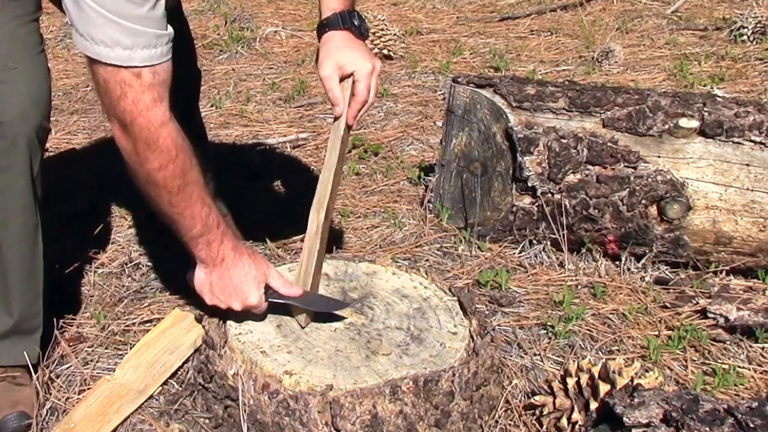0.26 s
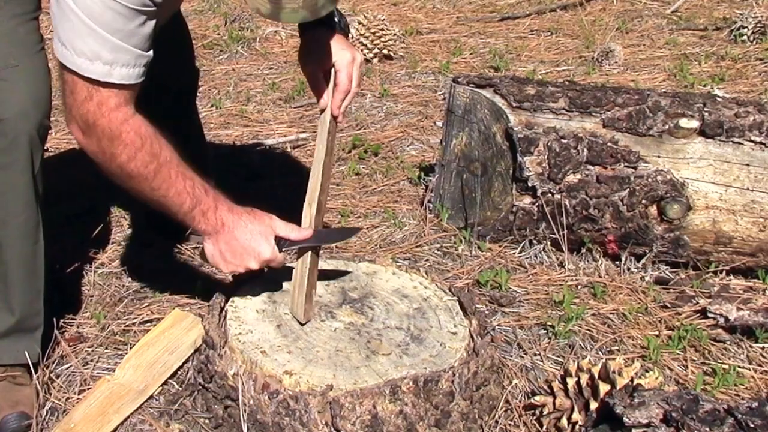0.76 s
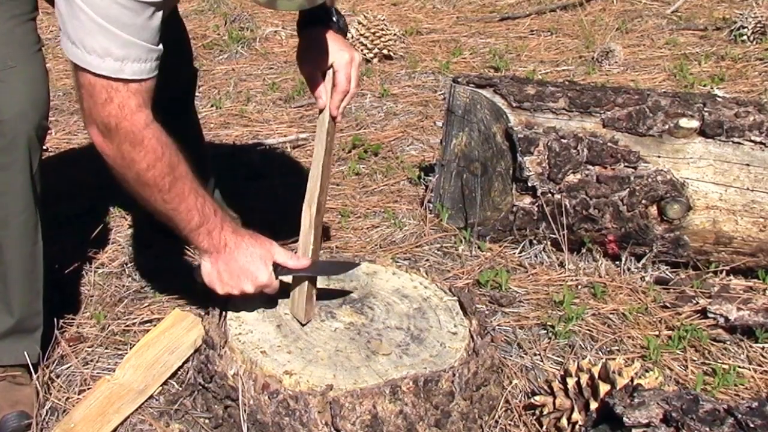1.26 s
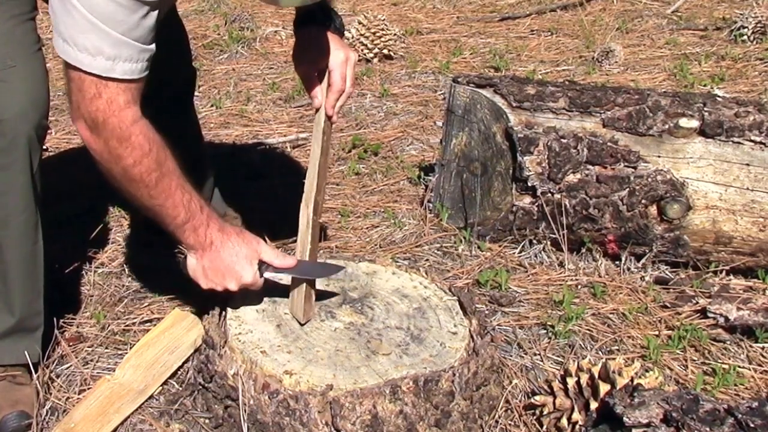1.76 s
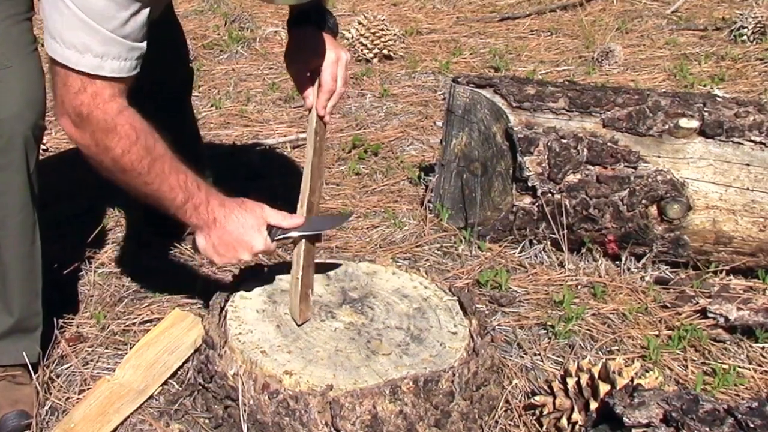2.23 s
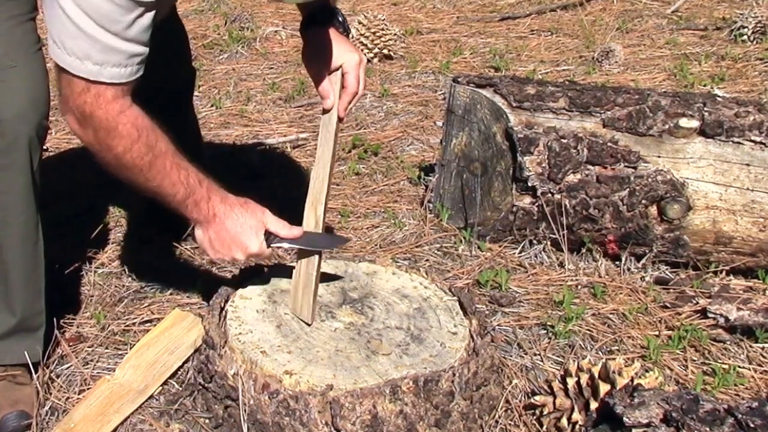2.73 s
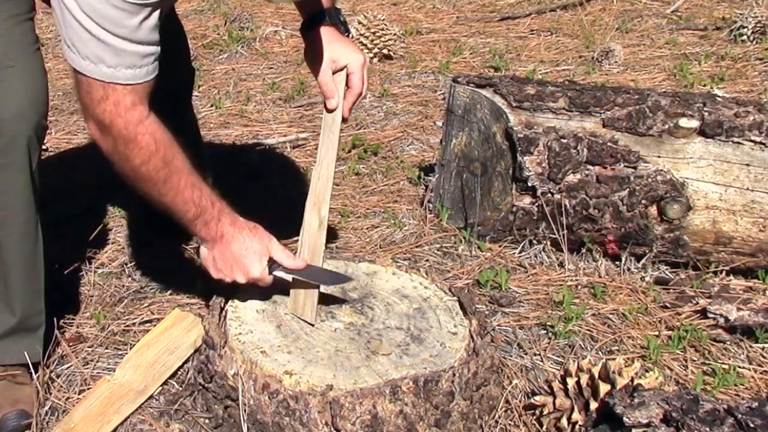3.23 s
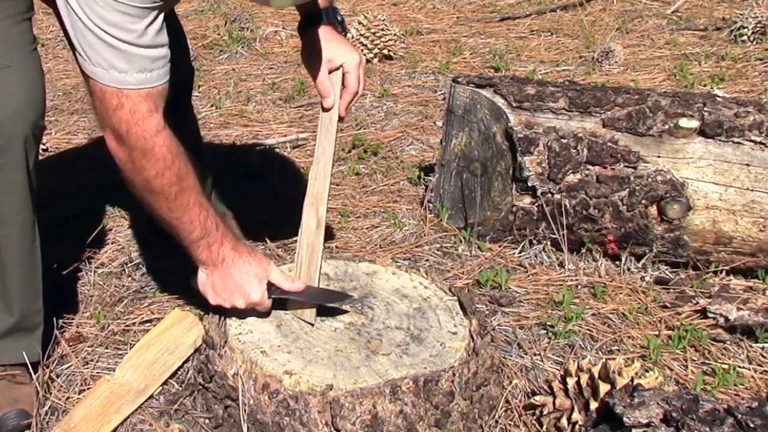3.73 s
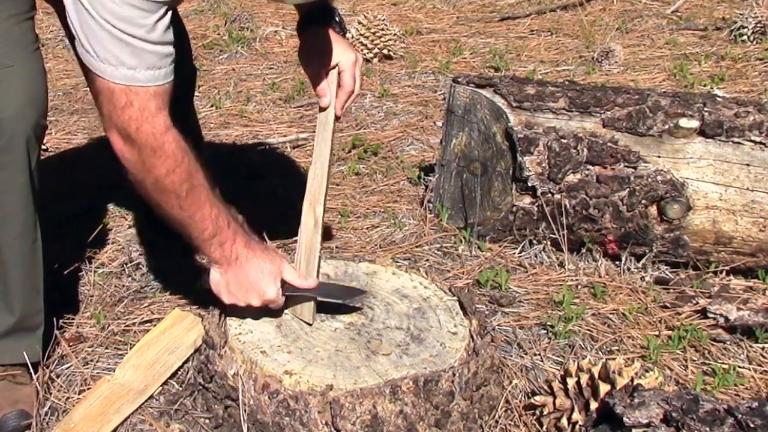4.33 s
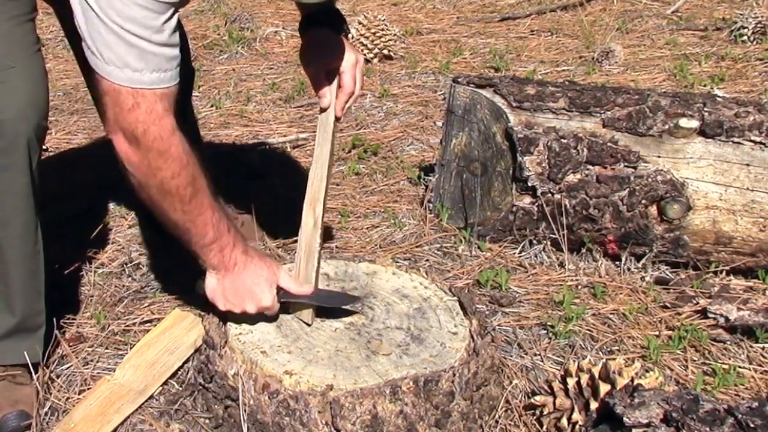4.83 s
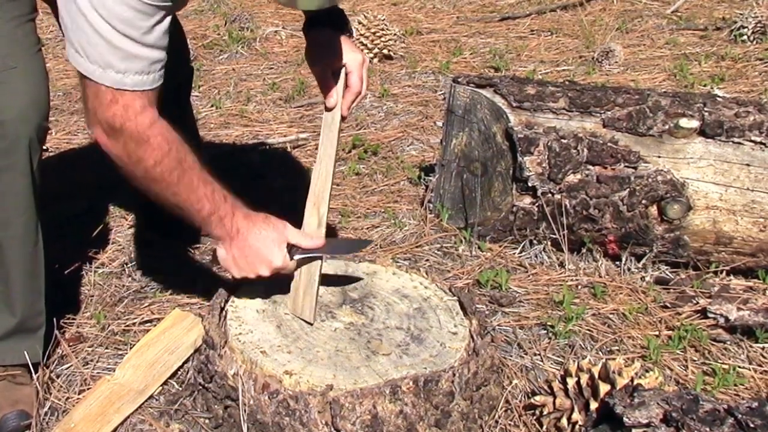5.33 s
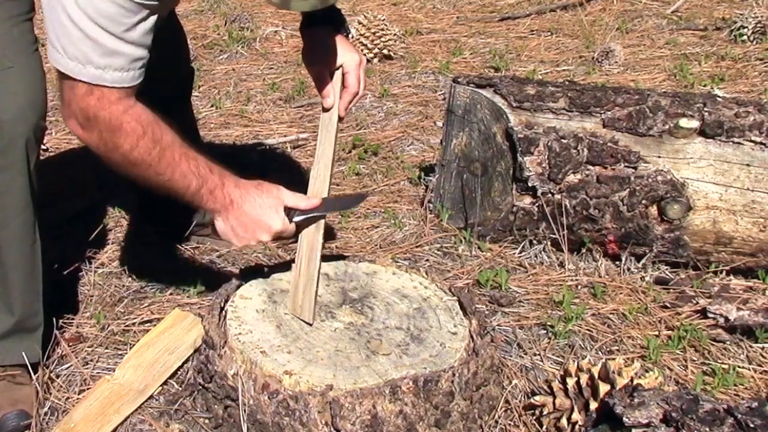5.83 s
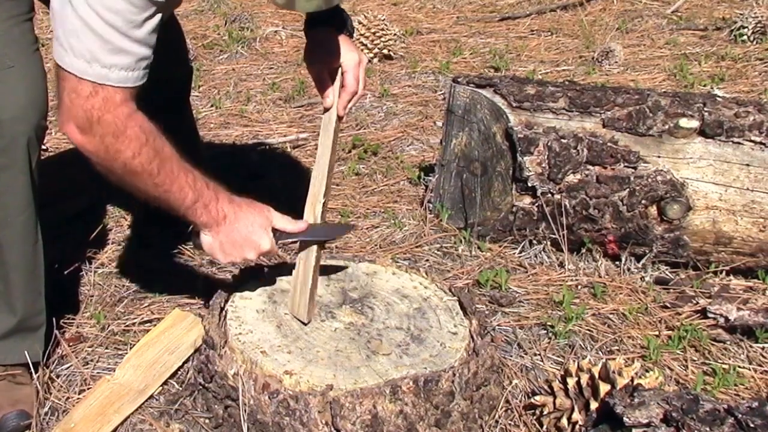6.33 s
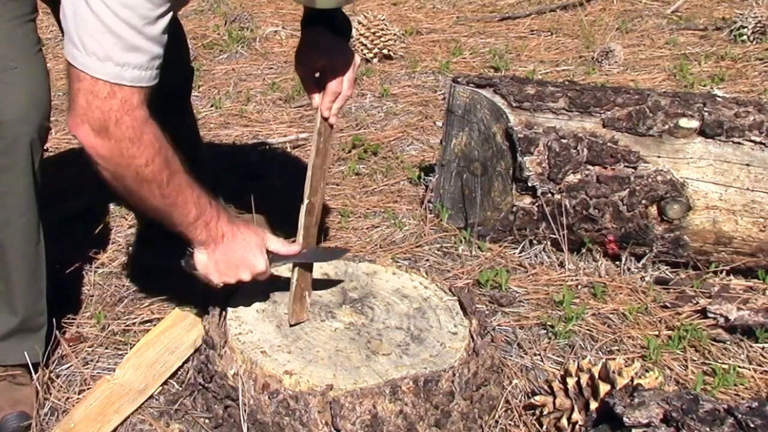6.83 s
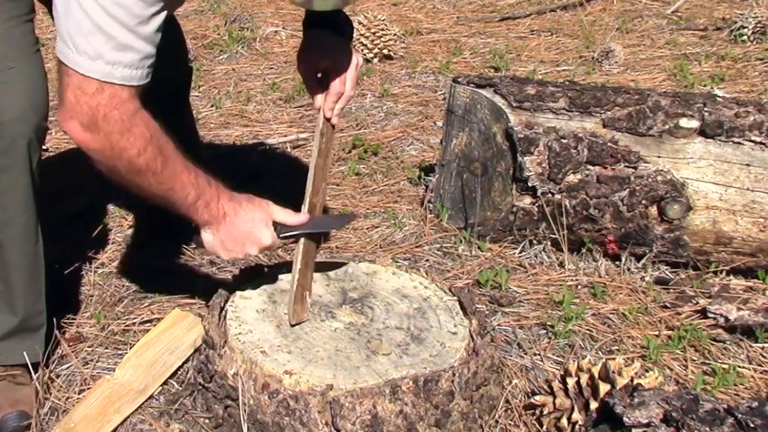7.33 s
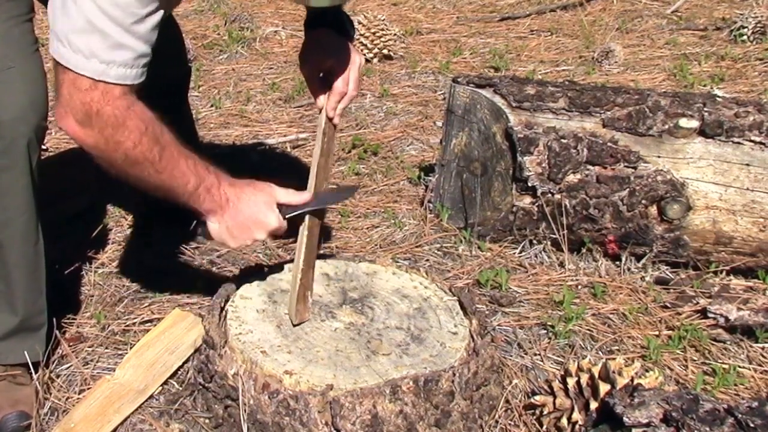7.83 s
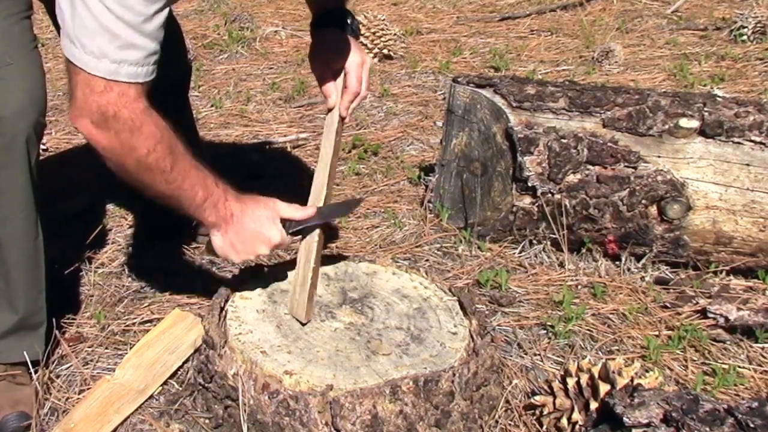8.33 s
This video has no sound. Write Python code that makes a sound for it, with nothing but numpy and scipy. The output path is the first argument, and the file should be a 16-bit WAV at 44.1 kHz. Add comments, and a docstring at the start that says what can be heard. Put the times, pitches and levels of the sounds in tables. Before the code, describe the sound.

Outdoors, close to the microphone, a steel knife spine scrapes quickly along a split stick standing on a stump. After a light first touch at about 0.1 s, short harsh down strokes alternate with softer, lower-pitched return strokes, a pair roughly every 0.27 s, until the sound ends mid-action at 8.6 s. Each stroke is a brief stick-slip burst: hollow woody judder, coarse midrange rasp, fine fibre fizz and a very faint high steel ring. From 2.7 s the tone becomes fuller and woodier, with louder returns, strongest around 3.5 to 6.2 s. After 6.4 s it turns thinner and drier, the returns losing body, while catches and splinter snaps become more frequent and sharp near 7.6 to 8.5 s. Faint distant wind and slight hiss continue beneath, with a short dull ground reflection.

```python
"""Knife scraping a split stick

A steel knife spine scrapes down and up a split stick that stands on a stump, outdoors.
The edge sticks and slips on the grain: coarse slips bend the stick, fine ones rasp in its upper modes,
torn fibres fizz and set the blade ringing. Snags knock the stick and splinters crack off.
Stump and forest floor return a dull tail; wind rushes faintly in far trees under slight microphone hiss."""
import sys
import numpy as np
from scipy import signal
from scipy.io import wavfile
from scipy.ndimage import uniform_filter1d

SR = 44100
rng = np.random.default_rng(int(sys.argv[2]) if len(sys.argv) > 2 else 0)


def wrap_up_sound(samples):
    """Save the sound to the file named by the first command line argument, as 16-bit audio."""
    columns = np.atleast_2d(samples).T
    # keep every value between -1 and 1, then stretch to whole-number steps
    tamed = np.clip(columns, -1, 1)
    steps = np.round(tamed * 32767).astype(np.int16)
    wavfile.write(sys.argv[1], SR, steps)


N = 377937


def amp(db):
    """Amplitude factor of a level in dB."""
    return 10 ** (np.asarray(db) / 20)


def evened(x):
    """Scales to unit RMS."""
    return x / np.sqrt(np.mean(x ** 2) + 1e-20)


def read(points, hz):
    """Reads a spectrum given as (Hz, dB) points, straight over log frequency."""
    f, value = np.transpose(points)
    return np.interp(np.log(hz + 1), np.log(f + 1), value)


def colour(x, points):
    """Minimum-phase filter with the given relative dB spectrum; white input keeps its power."""
    bins_hz = abs(np.fft.fftfreq(4096, 1 / SR))
    log_gain = np.log(amp(read(points, bins_hz)))
    taps = np.fft.ifft(np.exp(np.conj(signal.hilbert(log_gain)))).real[:2048]
    return signal.oaconvolve(x, taps / np.linalg.norm(taps))[:N]


def resonate(x, hz, width_hz):
    """Shifts hz down to zero, smooths, shifts back; white input keeps its power."""
    turn = np.exp(2j * np.pi * np.cumsum(hz * np.ones(N)) / SR)
    r = np.exp(-np.pi * width_hz / SR)
    smoothed = signal.lfilter([1], [1, -r], x / turn)
    return np.sqrt(2 * (1 - r * r)) * (turn * smoothed).real


def modes(x, table, slide=1):
    """Sum of resonances with alternating sign, their pitches multiplied by slide."""
    total = np.zeros(N)
    for k, (hz, width_hz, db) in enumerate(table):
        total += (-1) ** k * amp(db) * resonate(x, hz * slide, width_hz)
    return total


def slips(per_s, spread_db):
    """Random clicks of either sign, a few of them large, at unit RMS."""
    struck = rng.random(N) < per_s / SR
    size = np.minimum(rng.exponential(1, N), 3)
    sign = rng.choice([-1., 1.], N)
    return evened(struck * sign * amp(spread_db * size))


def chatter(ms, depth_db):
    """Gain that wavers at random over a few milliseconds, as edge pressure does; depth is RMS."""
    size = max(round(ms * SR / 1000), 1)
    smooth = uniform_filter1d(uniform_filter1d(rng.standard_normal(N), size), size)
    return amp(depth_db * evened(smooth))


def swelled(t, s, db, roundness=0.15):
    """Joins level points as rounded swells rather than straight ramps in dB."""
    return np.interp(t, s, amp(db) ** roundness) ** (1 / roundness)


# Microphone hiss spectrum. Each row: frequency in Hz, relative density in dB per Hz.
HISS_SPECTRUM = [(30, -2), (300, 1.5), (800, -9), (1500, -12), (3000, 0), (5000, 4), (12000, -8),
                 (15500, -12)]
HISS_DB = -75


def microphone_hiss():
    """Steady coloured noise."""
    return amp(HISS_DB) * evened(colour(rng.standard_normal(N), HISS_SPECTRUM))


# Wind spectrum. Each row: frequency in Hz, relative density in dB per Hz.
WIND_SPECTRUM = [(18, -19), (30, -10.5), (141, 1.5), (311, -7.5), (721, 0), (844, 1.5), (1540, -6.5),
                 (1910, -8.5), (4190, -32), (13000, -41.5), (16000, -38)]
# Slow rise of the wind. Each row: time in seconds, level in dB re WIND_DB.
WIND_RISE = [(0, -5.5), (.6, 0), (8.57, 1)]
WIND_DB = -52.5


def wind():
    """Coloured noise as a far rush that rises a little and swells slowly."""
    swell = evened(uniform_filter1d(uniform_filter1d(rng.standard_normal(N), size=9000), size=9000))
    rise_db = np.interp(np.arange(N) / SR, *np.transpose(WIND_RISE))
    rush = evened(colour(rng.standard_normal(N), WIND_SPECTRUM))
    return amp(WIND_DB + rise_db + 0.3 * swell) * rush


def ground(x):
    """Stump, log and forest floor scatter a short dull tail back: decaying noise as impulse response."""
    t = np.arange(round(.3 * SR)) / SR
    tail = rng.standard_normal(len(t)) * amp(-60 * t / 0.19) * (t > .003)
    scattered = signal.oaconvolve(x, tail / np.linalg.norm(tail))
    return colour(scattered, [(100, 9.5), (1000, -6), (4000, -1.5), (12000, -3)])


# Splinters snapping off. Each row: time in seconds, relative level in dB.
SPLINTERS = [(0.0985, -47), (0.238, -28.5), (0.6086, -39), (1.4553, -37), (1.5293, -33), (1.6941, -36),
             (2.877, -34), (2.918, -37.5), (3.167, -32), (3.19, -35), (3.4434, -32), (4.8185, -46),
             (5.135, -25), (5.397, -30), (5.518, -46), (5.961, -33), (6.265, -47), (6.2777, -48),
             (6.3573, -33), (6.375, -26), (6.773, -44), (6.8024, -40), (7.142, -29.5), (7.62, -34),
             (7.6289, -25), (8.048, -37), (8.0963, -25.5), (8.2662, -32), (8.513, -29.5), (8.559, -29)]


def splinters():
    """Each snap is a wide noise crack that decays 60 dB in 12 ms."""
    t, out = np.arange(500) / SR, np.zeros(N + 500)
    for s, db in SPLINTERS:
        crack = amp(db + 3.0 - 60 * t / 0.012) * rng.standard_normal(len(t))
        out[round(s * SR):][:len(t)] += crack
    return colour(out[:N], [(1200, -4), (3000, 2.5), (6000, 4.5), (9500, -2.5), (12500, -11.5), (15200, -32)])


# Slow drift of the treble. Each row: time in seconds, relative level of the highest fizz in dB,
# relative level of the blade ring in dB.
TREBLE_DRIFT = [(0, -17.5, -40), (.8, 4, -25), (1.5, 0.5, -30), (2.2, 0, -25), (3.4, -20, -34),
                (4.4, -1.5, -42), (6, 3.5, -34), (6.6, -1, -21), (7.8, 6, -27), (8.57, 7, -31)]


def treble(t, bite):
    """Gains of the highest fizz and the blade ring: slow drift, duller at low bending pitch."""
    drift_s, top_db, ring_db = np.transpose(TREBLE_DRIFT)
    top = amp(np.interp(t, drift_s, top_db) + 5.7 * bite)
    ring = amp(np.interp(t, drift_s, ring_db) + 4.0 * bite)
    return top, ring


BLADE_HZ, BLADE_WIDTH_HZ = 14530, 80


def blade(tear, ring):
    """Tearing fibres set one narrow mode of the steel ringing."""
    return resonate(tear * ring * chatter(10.0, 3.0), BLADE_HZ, BLADE_WIDTH_HZ)


# Colour of tearing fibres. Each row: frequency in Hz, relative level in dB.
FIBRES = [(2500, -23), (3700, -5), (6900, 5.5), (7800, 0), (12000, -37.5), (14300, -56), (15200, -79.5)]
# Small modes of shavings and blade. Each row: frequency in Hz, width in Hz, relative level in dB.
SHAVINGS = [(4056, 270, -19.5), (4340, 740, -15.5), (5280, 370, -13.5), (5600, 170, -22.5),
            (6470, 220, -19.5), (6960, 180, -15.5), (8680, 290, -26.5), (9380, 240, -24.5),
            (9800, 250, -45), (11650, 200, -42), (12900, 530, -54)]


def fizz(tear, top):
    """Finest slips tear fibres and stir small modes, each with its own chatter."""
    out = amp(-6.0) * colour(tear, FIBRES)
    for hz, width_hz, db in SHAVINGS:
        drift = top if hz > 8000 else 1
        out += amp(db) * resonate(tear * drift * chatter(11.0, 7.73), hz, width_hz)
    return colour(out, [(2500, -3), (3800, 5.5), (14000, -5.0), (15200, -13)])


# Lower rasp modes of the stick. Each row: frequency in Hz at bending pitch MIDDLE_HZ, width in Hz,
# relative level in dB.
LOWER_RASP = [(1792, 215, -6), (2040, 262, -6.5)]
# Upper rasp modes, in the same columns.
UPPER_RASP = [(2607, 290, -4.5), (2908, 238, -1.5), (3109, 144, -1.5)]
MIDDLE_HZ = 569
SLIDE = 0.086  # exponent: share of the bending pitch's movement that the rasp modes follow


def rasp(fine, lower, bend_hz):
    """Fine slips ring the upper modes of the stick, which slide a little with the bending pitch."""
    slide = (bend_hz / MIDDLE_HZ) ** SLIDE
    out = modes(fine * lower * chatter(3.8, 1.6), LOWER_RASP, slide)
    out += modes(fine * chatter(19.0, 2.07), UPPER_RASP, slide)
    return colour(out, [(700, -4.5), (1350, -0.5), (1700, 4.0), (3200, 1), (3600, 3.5), (8000, -22.5)])


# Stump modes. Each row: frequency in Hz, width in Hz, relative level in dB.
STUMP = [(98, 53, -19), (203.6, 34, -15.5)]
# Flanks of the bending mode, in the same columns.
FLANKS = [(411, 263, -9.5), (618, 82, -16.5)]
# Modes of the flat face, in the same columns.
FACE = [(897, 970, -35), (936, 540, -29)]
BENDING_WIDTH_HZ = 121


def judder(push, bend_hz, stump, face, flanks):
    """Coarse slips bend the stick in a gliding mode and shake its flanks, the stump and the flat face."""
    out = resonate(push, bend_hz, BENDING_WIDTH_HZ) - modes(push * flanks, FLANKS)
    out += modes(push * stump, STUMP) + modes(push * face, FACE)
    return colour(out, [(30, -39.0), (100, -0.5), (300, 5.5), (1100, 3.0), (1500, -3.5), (5000, -50.0)])


# Edge catching on a ridge. Each row: time in seconds, relative impulse level in dB.
SNAGS = [(0.1, -18.5), (0.2958, -20), (0.3103, -14), (0.4382, -16), (0.4699, -14.5), (0.5939, -10.5),
         (0.7605, -18.5), (0.8191, -11), (0.8334, -13), (0.858, -21), (0.8695, -8.5), (0.98, -18),
         (1.196, -14), (1.2798, -9.5), (1.3242, -13.5), (1.5183, -10.5), (1.5255, -21), (1.5407, -15),
         (1.5869, -39), (1.664, -15), (1.7852, -8.5), (1.8251, -10), (1.9498, -10.5), (2.0339, -14.5),
         (2.1945, -27), (2.3529, -22), (2.5844, -11), (2.756, -9), (3.3065, -13), (3.4117, -18.5),
         (3.5509, -8.5), (3.5831, -10), (3.6584, -15), (3.7535, -12), (3.9056, -6.5), (3.9617, -16.5),
         (4.3666, -7), (4.487, -12), (4.8101, -28), (4.8649, -31), (4.9966, -12), (5.0094, -17),
         (5.518, -9), (5.8051, -13.5), (5.8205, -5), (6.2019, -8.5), (6.3296, -17.5), (6.3743, -11),
         (6.4897, -11.5), (6.5207, -15), (6.9003, -28), (7.036, -12), (7.239, -11.5), (7.2787, -18),
         (7.368, -29), (7.469, -10), (7.4805, -10.5), (7.5845, -14.5), (7.7022, -13), (7.7147, -5.5),
         (7.8172, -22), (7.8242, -19.5), (7.9337, -9.5), (7.9462, -2.5), (8.047, -6), (8.0953, -15.5),
         (8.1679, -9.5), (8.1787, -6.5), (8.2807, -10.5), (8.3148, -6.5), (8.3989, -10), (8.4111, -12),
         (8.4308, -8), (8.5194, -11.5), (8.5575, -8)]


def snags():
    """Each catch knocks the stick with one impulse."""
    at_s, db = np.transpose(SNAGS)
    out = np.zeros(N)
    out[np.round(at_s * SR).astype(int)] = amp(db)
    return out


# Stick turned to its flat face. Columns: middle of the turn there in seconds, middle of the turn back
# in seconds, time each turn takes in seconds.
TURNED = (2.69, 6.42, 0.05)
# Mode gains on the narrow edge. Columns: stump in dB, flat face in dB, lower rasp in dB,
# flanks of the bending mode in dB, all relative.
ON_EDGE = (1, 8, -1, -1)
# Mode gains on the flat face, in the same columns.
ON_FACE = (-4, 26, 3.5, 0.2)


def stick_side(t):
    """Gains of stump, flat face, lower rasp and flanks as the stick is turned."""
    from_s, to_s, turn_s = TURNED
    turned = np.clip(np.minimum(t - from_s, to_s - t) / turn_s + .5, 0, 1)
    return [amp(edge + (flat - edge) * turned) for edge, flat in zip(ON_EDGE, ON_FACE)]


# Level where contact begins and ends, re the stroke. Columns: judder in dB, rasp in dB, fizz in dB.
EDGE_DB = [-30.5, -30, -31.5]


def strokes(rows, glide_hz, fizz_grow_db):
    """Judder, rasp and fizz rise, hold and fall under each stroke; also the points of the bending pitch."""
    t, levels, pitch = np.arange(N) / SR, np.zeros((3, N)), []
    for start, length, rise, fall, judder_db, rasp_db, fizz_db, hz, *grow_db in rows:
        s = start + np.array([0, rise, max(length - fall, rise), length])
        part = slice(round(s[0] * SR), round(s[-1] * SR))
        stroke_db, grows_db = (judder_db, rasp_db, fizz_db), (*grow_db, fizz_grow_db)
        for level, db, grow, edge in zip(levels, stroke_db, grows_db, EDGE_DB):
            level[part] += swelled(t[part], s, db + np.array([edge, -grow / 2, grow / 2, edge]))
        pitch += [(s[1], hz - glide_hz / 2), (s[2], hz + glide_hz / 2)]
    return levels, pitch


# Strokes down the stick. Each row: start in seconds, length in seconds, rise in seconds, fall in seconds,
# judder in dB, rasp in dB, fizz in dB (all relative), middle bending pitch in Hz,
# growth of judder in dB and of rasp in dB over the full contact.
DOWN = [(0.225, 0.12, 0.005, 0.045, -30, -35.5, -46, 546, -1, -28),
        (0.516, 0.15, 0.052, 0.051, -27.5, -30.5, -43, 593, 1, -8.5),
        (0.801, 0.099, 0.021, 0.024, -28, -32, -41, 584, 1, -11.5),
        (1.015, 0.12, 0.035, 0.047, -24.5, -31.5, -42.5, 555, 5, -10),
        (1.239, 0.1, 0.052, 0.019, -25, -30.5, -40, 596, 3, -15),
        (1.495, 0.13, 0.026, 0.055, -22.5, -26, -40, 598, -2, -10),
        (1.738, 0.13, 0.046, 0.051, -24.5, -29, -45.5, 590, 8.5, -5),
        (2.02, 0.079, 0.0053, 0.023, -29, -34, -47, 566.0, 12, -10),
        (2.288, 0.093, 0.0077, 0.043, -22, -28.5, -38, 590, 12, -9),
        (2.547, 0.11, 0.017, 0.059, -26.5, -26.5, -38, 620, 6, -3),
        (2.811, 0.138, 0.016, 0.057, -24.5, -30.5, -40, 551.0, -1.5, -16),
        (3.104, 0.13, 0.013, 0.066, -25.5, -28, -37.5, 523, 13.5, -6),
        (3.386, 0.13, 0.022, 0.063, -23, -25.5, -34.5, 590, 10, -11),
        (3.663, 0.14, 0.049, 0.06, -18.5, -23, -32, 610, 4.5, -8.5),
        (3.961, 0.17, 0.059, 0.079, -25.5, -27, -41, 624, 9, -5),
        (4.268, 0.14, 0.045, 0.062, -23, -23, -34, 640, 17.5, -10),
        (4.536, 0.12, 0.019, 0.054, -24, -30.5, -40.5, 618.0, 12, -11.5),
        (4.789, 0.13, 0.017, 0.062, -24, -29, -39.5, 627, 15.5, -13),
        (5.052, 0.12, 0.044, 0.057, -21, -23.5, -34.5, 560, 6, -9),
        (5.332, 0.13, 0.03, 0.054, -17.5, -24.5, -36.5, 542, 7, -7.5),
        (5.605, 0.12, 0.045, 0.039, -19, -24.5, -34, 572.0, 14.5, -11),
        (5.871, 0.16, 0.062, 0.061, -21.5, -29, -37, 547, 12, -12.5),
        (6.164, 0.12, 0.03, 0.066, -22.5, -22, -32, 577, 16, -8.5),
        (6.423, 0.14, 0.045, 0.042, -30.5, -34, -47, 563, 2.5, -12),
        (6.712, 0.12, 0.02, 0.062, -32.5, -28, -37.5, 586, 20.5, 0),
        (6.958, 0.1, 0.038, 0.027, -25, -28.5, -37.5, 570, 15, 1),
        (7.186, 0.118, 0.035, 0.036, -30, -31, -37, 570, 18, -1),
        (7.421, 0.09, 0.034, 0.015, -29, -28, -38.5, 603, 22, -1),
        (7.651, 0.1, 0.029, 0.029, -25, -28, -38.5, 570.0, 18, 0.5),
        (7.904, 0.082, 0.0071, 0.021, -21.5, -26, -39.5, 570, 12, -1),
        (8.134, 0.084, 0.024, 0.038, -24.5, -23, -35, 600, 25.5, -1),
        (8.35, 0.12, 0.044, 0.056, -22, -25, -35.5, 580, 16.5, -2)]
# Return strokes up the stick, in the same columns.
UP = [(0.081, 0.046, 0.019, 0.065, -29, -31, -52, 550, 8.5, -11),
      (0.323, 0.21, 0.076, 0.063, -34.5, -45.5, -59, 500, -5.5, 30),
      (0.64, 0.17, 0.066, 0.068, -33.5, -34, -49, 400, 5, 10),
      (0.854, 0.169, 0.059, 0.042, -39.5, -45.5, -54, 436.0, 12, 22),
      (1.076, 0.16, 0.056, 0.036, -40.5, -40.5, -53.5, 487, 13, 19),
      (1.321, 0.19, 0.033, 0.089, -37, -44.5, -52.5, 495, 14.5, 25),
      (1.636, 0.11, 0.024, 0.03, -36.5, -37.5, -56, 474, -10, 8),
      (1.865, 0.12, 0.034, 0.042, -29.5, -35.5, -49.5, 454, 4, 9),
      (2.147, 0.12, 0.0087, 0.064, -36, -36.5, -49, 510, 24, 11),
      (2.394, 0.14, 0.076, 0.042, -29, -33.5, -47, 470, -8, 2),
      (2.68, 0.11, 0.023, 0.037, -33.5, -39, -59.5, 520, 9, 17),
      (2.947, 0.14, 0.023, 0.057, -25, -34.5, -51, 525, 3.5, 20),
      (3.245, 0.13, 0.013, 0.062, -22, -35, -44, 562, 5.5, 20.5),
      (3.52, 0.15, 0.021, 0.069, -19, -31.5, -40, 540, 1.5, 15),
      (3.805, 0.21, 0.064, 0.093, -24.5, -30.5, -40, 480, -10, 10),
      (4.127, 0.14, 0.056, 0.031, -27, -31, -41.5, 482, -12, 10),
      (4.39, 0.14, 0.048, 0.042, -26.5, -38, -49, 532.0, 5, 20),
      (4.655, 0.13, 0.031, 0.045, -25.5, -37, -51.5, 495, 6.5, 19),
      (4.924, 0.11, 0.033, 0.029, -24.5, -36, -48.5, 530, 3, 13.5),
      (5.206, 0.12, 0.038, 0.029, -21, -28.5, -48, 497.0, -4, 7.5),
      (5.49, 0.12, 0.022, 0.049, -22.5, -30.5, -46.5, 480, 2, 16),
      (5.722, 0.16, 0.077, 0.034, -21, -29.5, -41.5, 490, -3, -3),
      (6.036, 0.127, 0.043, 0.04, -23.5, -30, -48, 497, -12, 4),
      (6.3, 0.13, 0.035, 0.056, -28.5, -31, -45, 532.0, 2, 8),
      (6.58, 0.14, 0.023, 0.061, -42.5, -32, -51, 538.0, 5, 0),
      (6.824, 0.13, 0.09, 0.042, -32, -28, -42, 542, -8, -7),
      (7.062, 0.151, 0.056, 0.075, -37.5, -28, -38, 530, 12, 8.5),
      (7.305, 0.14, 0.012, 0.075, -41, -33.5, -44.5, 506, 14, 14),
      (7.501, 0.17, 0.084, 0.051, -43.5, -33, -43, 490, -15, -11),
      (7.741, 0.16, 0.083, 0.051, -46.5, -36.5, -48, 490, -17, -10),
      (7.986, 0.14, 0.052, 0.043, -31, -31, -42.5, 590, -4, -4),
      (8.216, 0.16, 0.046, 0.056, -31.5, -34, -48, 574, 12, -11),
      (8.469, 0.16, 0.057, 0.047, -34.5, -34.5, -44, 654, -13, -4)]
# Shared by all strokes down. Columns: pitch glide in Hz, growth of the fizz in dB.
DOWN_SHAPE = (36, 1)
# Shared by all strokes up, in the same columns.
UP_SHAPE = (-68, 7.8)
# Whisper of the edge resting on the wood. Columns: start in seconds, relative rasp in dB,
# relative fizz in dB.
RESTING = (.23, -64.5, -70)


def contact(t):
    """Judder, rasp and fizz levels of all strokes over the resting whisper, and the bending pitch."""
    down, down_hz = strokes(DOWN, *DOWN_SHAPE)
    up, up_hz = strokes(UP, *UP_SHAPE)
    judder_level, rasp_level, fizz_level = down + up
    from_s, rest_rasp_db, rest_fizz_db = RESTING
    rasp_level = rasp_level + amp(rest_rasp_db) * (t > from_s)
    fizz_level = fizz_level + amp(rest_fizz_db) * (t > from_s)
    bend_hz = np.interp(t, *np.transpose(sorted(down_hz + up_hz)))
    return judder_level, rasp_level, fizz_level, bend_hz


FULL_JUDDER_DB = -24.5
THINNING = 0.21  # dB that the lower rasp loses for each dB of judder below FULL_JUDDER_DB


def scrape():
    """Coarse, fine and finest slips under the strokes, each ringing its part of stick and blade."""
    t = np.arange(N) / SR
    judder_level, rasp_level, fizz_level, bend_hz = contact(t)
    stump, face, lower, flanks = stick_side(t)
    lower = lower * (judder_level / amp(FULL_JUDDER_DB)) ** THINNING
    # a low bending pitch marks the return stroke: it thuds in the stump and tears more dully
    bite = np.clip((bend_hz - 545) / 100, -1.2, .6)
    stump = stump * amp(-4.0 * bite)
    top, ring = treble(t, bite)

    pressure, coarse, snag = chatter(3.34, 2.84), slips(700, 2.86), snags()
    push = judder_level * evened(coarse * pressure + 0.26 * slips(3000, 4.7)) + amp(13.0) * snag
    fine = rasp_level * evened(slips(3000, 3.2) * pressure + 0.29 * coarse) + amp(1.0) * snag
    tear = fizz_level * evened(slips(9000, 5.2) * pressure + 0.072 * coarse)

    out = amp(-13.5) * judder(push, bend_hz, stump, face, flanks)
    out += amp(-10.0) * rasp(fine, lower, bend_hz)
    out += amp(-7.0) * fizz(tear, top)
    return out + blade(tear, ring)


def scene():
    """Both channels carry the same sound; only the faint hiss enters with opposite sign."""
    knife = amp(-2.32) * (scrape() + splinters())
    mid = knife + amp(-23.5) * ground(knife) + wind()
    hiss = microphone_hiss()
    return np.array([mid + hiss, mid - hiss])


BAND_LIMIT_HZ = 15900


def record(dry):
    """The microphone fades at the very top; then a steep low-pass limits the band."""
    response = [(30, 0), (14700, 0), (15700, -22), (22000, -22)]
    faded = np.array([colour(channel, response) for channel in dry])
    low_pass = signal.firwin(511, BAND_LIMIT_HZ, window=("kaiser", 9), fs=SR)
    return signal.oaconvolve(faded, low_pass[None], "same")


dry = scene()
out = record(dry)
wrap_up_sound(out)
```